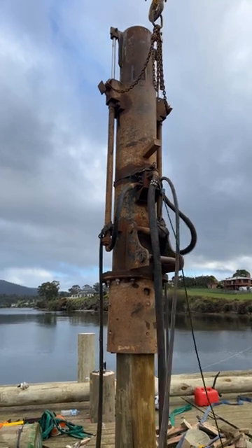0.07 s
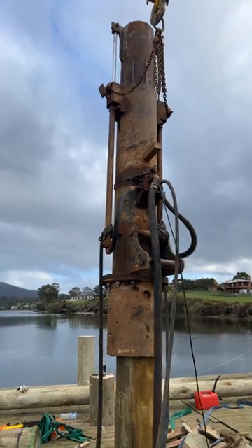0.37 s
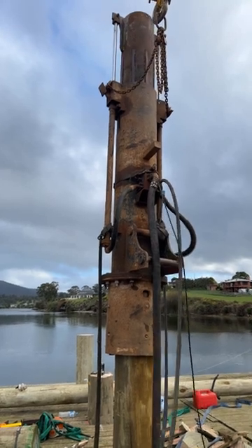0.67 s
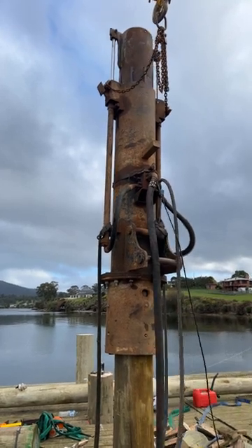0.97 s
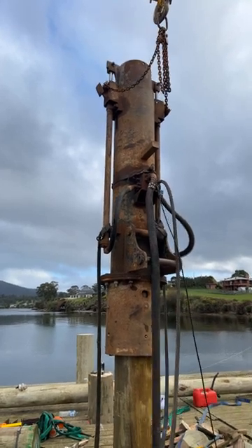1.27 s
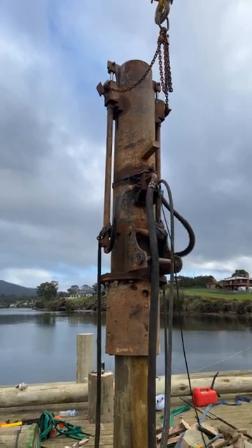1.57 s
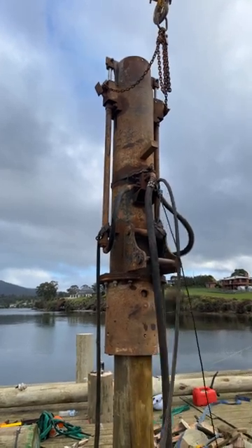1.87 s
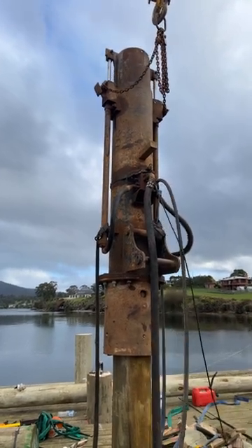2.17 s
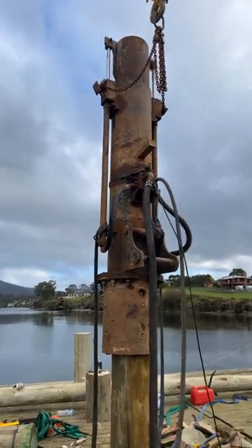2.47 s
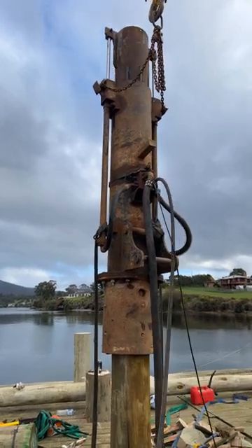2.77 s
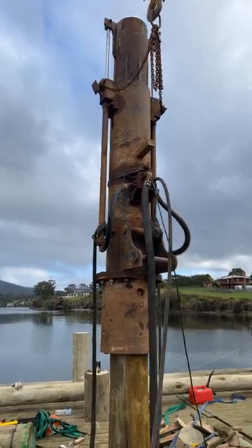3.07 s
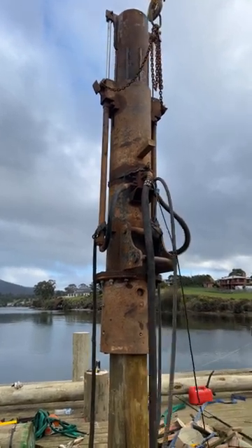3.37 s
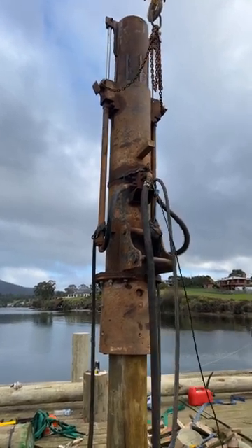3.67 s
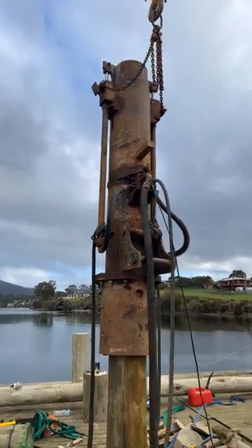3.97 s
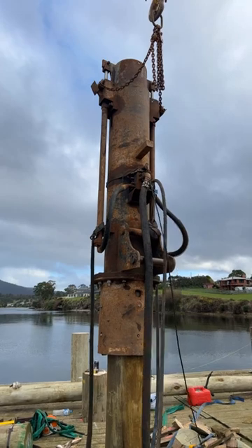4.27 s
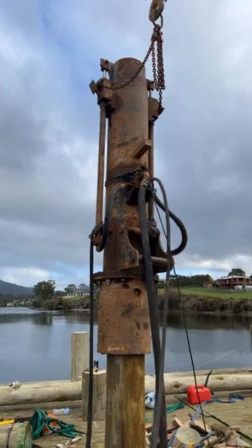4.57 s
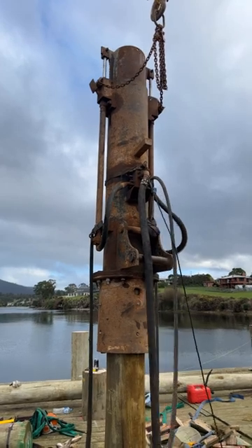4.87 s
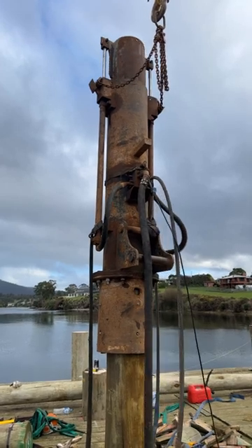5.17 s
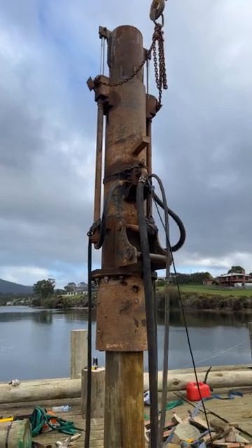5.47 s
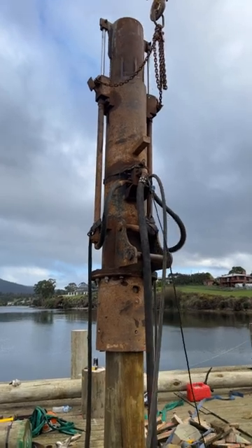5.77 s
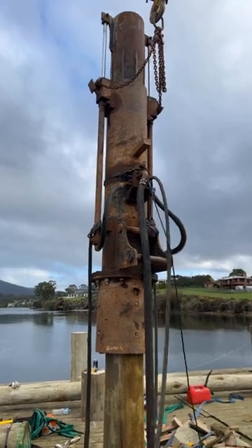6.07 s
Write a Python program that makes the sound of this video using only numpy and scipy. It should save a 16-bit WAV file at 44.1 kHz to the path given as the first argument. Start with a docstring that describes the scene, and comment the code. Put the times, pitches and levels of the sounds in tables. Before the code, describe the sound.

Over a droning engine, a heavy drop hammer slams twice onto a steel pile cap, with sharp valve clacks before and after.

```python
"""A hydraulic drop hammer drives a timber pile from a river jetty: two clanging blows.
A valve clacks, the rigging rattles, the ram slides down, slams onto the steel cap and chatters,
and the banks throw the blow back. The valve clacks again and oil surges to lift the ram.
Underneath drones the power pack, running up while the ram is free, sagging and hunting under load.
Each blow makes a limiter duck the drone."""
import sys
import numpy as np
from scipy import signal
from scipy.fft import rfft, irfft
from scipy.io import wavfile
from scipy.ndimage import uniform_filter1d, minimum_filter1d, map_coordinates

SR = 44100
rng = np.random.default_rng(int(sys.argv[2]) if len(sys.argv) > 2 else 0)


def transcribe(u):
    """Save the signal u as a 16-bit wav file named by the first command-line argument.

    u: samples, shape (n,) or (channels, n), limited to [-1, 1]; the rate is SR.
    q: integer samples, one column per channel.
    """
    v = np.clip(np.atleast_2d(u).T, -1, 1)
    q = np.round(v * 32767).astype(np.int16)
    wavfile.write(sys.argv[1], SR, q)


N = 278712

# fader ride of the exhaust drone: time_s, level_db
EXHAUST_FADER = [(0, -16.5), (1.1, -17), (1.6, -18), (6.32, -17.5)]
# partials of the exhaust note: multiple_of_firing_rate, relative_db
EXHAUST_ORDERS = [(1, -1.5), (1.5, -15), (2, 3.5), (3, 0), (3.5, -34), (4, -27), (4.5, -24.5), (5, -38.5),
                  (6.5, -33), (7, -44.5), (8, -38.5), (9.25, -35.5), (12.5, -32.5)]
# tone of the engine's clatter: frequency_hz, relative_db
CLATTER_SPECTRUM = [(60, -7), (170, 1.5), (230, -2.5), (290, -7), (500, -13.5), (700, -15), (900, -21.5),
                    (1400, -21), (2300, -24), (3000, -30.5), (5000, -34.5), (6200, -46), (9500, -59.5),
                    (15000, -67)]
# resonances of the engine casing: centre_hz, width_hz, boost_db
CASING_RESONANCES = [(290, 69, 1.5), (437.3, 18, 6), (615, 110, 5), (1210, 300, 4.5), (3520, 590, 4.5)]
# low rumble under the engine: frequency_hz, relative_db
RUMBLE_SPECTRUM = [(20, -31.5), (32, -26.5), (48, -7.5), (75, 2.5), (115, -6.5), (150, -6),
                   (185, -17.5), (260, -33), (900, -78)]
# diffuse tails of jetty and shore: delay_s, level_db, t60_s, cutoff_hz
SHORE_TAILS = [(0.031, -24, 0.64, 5040), (0.448, -52, .9, 1470)]
# echoes off the banks: delay_s, level_db
BANK_ECHOES = [(.144, -17), (.293, -36.5), (.765, -43), (.96, -46.5), (1.1, -47), (1.44, -47.5)]
# rigging rattles as the ram is let go: after_valve_s, level_db, centre_hz, width_octaves
RIGGING_RATTLES = [(.075, -48, 1680, .2), (.075, -56.5, 4800, .26), (.158, -57.5, 5000, .38),
                   (.196, -52.5, 4240, .38)]
# valve clacks, dropping and lifting the ram in turn: start_s, level_db, pitch_ratio
VALVE_CLACKS = [(0.6294, -22.5, 1.04), (1.6244, -21, 1.037), (3.4111, -23.5, 1.036), (4.434, -21, 1.035),
                (6.292, -22, 1.005)]
# ring of the valve: pitch_hz, relative_db, t60_s
VALVE_MODES = [(1150, -19.5, 0.019), (1750, -10.5, .009), (2100, -13, 0.014), (3384, -5.5, 0.022),
               (4420, -2, 0.0085), (4990, -0.5, 0.0047), (6430, -14, 0.0062), (6990, -21, 0.016),
               (9100, -23, 0.0042), (13300, -21, .0025)]
# the valve's tick scattered by the deck: delay_s, level_db, t60_s, cutoff_hz
DECK_REFLECTIONS = [(.001, -3, 0.014, 14000), (.006, -11, 0.049, 7180)]
# dense clang of cap and pile: frequency_hz, relative_db, t60_s
CLANG_SPECTRUM = [(60.5, -15.5, 0.43), (185, 3.5, 0.14), (230, -4, 0.2), (473, -6.5, 0.19),
                  (690, -5.5, 0.24), (990, -8.5, 0.15), (1500, -8.5, 0.21), (2310, -7, 0.18),
                  (2960, -17.5, 0.18), (3830, -13, 0.17), (4630, -18, .18), (6240, -28, 0.18),
                  (10500, -59, .24), (15000, -55, .22)]
# ring of the steel tube and the pile: pitch_hz, relative_db, t60_s
TUBE_MODES = [(172, -10, .22), (238, -24, .35), (288, -23, 1.1), (324, -27, .6), (406, -19.5, .36),
              (437, -24, .38), (584, -13, .2), (620, -19, .28), (680, -18, .28), (731, -19, .26),
              (765, -16, .3), (792, -21, .26), (848, -22, .26), (936, -19, .32), (978, -21, .3),
              (1119, -24, .33), (1223, -22, .3), (1258, -20, .33), (1298, -21, .36), (1348, -22, .22),
              (1823, -22, .21), (1882, -21, .21), (2290, -21, .17), (2355, -19, .17), (2428, -20, .16),
              (2675, -26, .22), (3640, -24, .2), (3780, -28, .22), (5280, -35.5, .38), (7510, -56.5, .48)]
# blows of the ram: slam_s, relative_db, tilt_db_per_octave
RAM_BLOWS = [(1.1935, 0, -0.5), (3.9759, -0.5, 0)]
# each blow's light touch, slam and rebounds: after_slam_s, body_db, crack_db, tilt_db_per_octave
BLOW_CONTACTS = [(-.017, -29.5, -41.5, -5), (0, 0.5, 9.5, -.5), (0.0201, -0.5, 0, -0.5),
                 (.027, -5.5, 0.5, 0), (0.0497, -6.5, -2.5, 2), (.069, -13.5, -14, -2)]

HUNT_HZ = 2.66   # the governor's swing, heard in the engine's pitch and in the oil


def from_db(db):
    """Decibels to gain."""
    return 10 ** (np.asarray(db) / 20)


def rms_one(x):
    """Normalise to an rms of 1."""
    return x / np.sqrt(np.mean(x ** 2) + 1e-20)


def seconds():
    """The time of every sample."""
    return np.arange(N) / SR


def bin_hz():
    """The frequency of every FFT bin, at least 1 Hz."""
    return np.maximum(np.arange(N // 2 + 1) * SR / N, 1)


def at_hz(spectrum, hz, column=1):
    """One column of a spectrum table, read on a log-frequency axis."""
    rows = np.array(spectrum)
    return np.interp(np.log(hz), np.log(rows[:, 0]), rows[:, column])


def bell_eq(hz, resonances):
    """The dB that a set of resonances adds at each frequency."""
    return sum(boost_db / (1 + (2 * (hz - centre) / width) ** 2)
               for centre, width, boost_db in resonances)


def noise(spectrum_db):
    """Noise of rms 1, coloured by an EQ curve."""
    return rms_one(irfft(rfft(rng.standard_normal(N)) * from_db(spectrum_db), N))


def drift(rate_hz):
    """A smooth random wobble of rms 1."""
    knots = rng.standard_normal(2048)
    return rms_one(map_coordinates(knots, [seconds() * rate_hz], order=2, mode="wrap"))


def clicks(times, sizes):
    """One-sample triggers."""
    out = np.full(N, 1e-18)
    out[np.round(np.asarray(times) * SR).astype(int)] = sizes
    return out


def fade(x, t60):
    """Each click becomes a step that dies away."""
    return signal.lfilter([1], [1, -from_db(-60 / (t60 * SR))], x)


def ring(x, hz, t60):
    """Each click sets a decaying sine ringing."""
    radius, angle = from_db(-60 / (t60 * SR)), 2 * np.pi * hz / SR
    return signal.lfilter([0, np.sin(angle)], [1, -2 * radius * np.cos(angle), radius * radius], x)


def low_pass(x, hz):
    """Roll off the top at 12 dB per octave."""
    return signal.sosfilt(signal.butter(2, min(hz, .45 * SR), fs=SR, output="sos"), x)


def scatter(x, reflectors):
    """Each reflector returns a delayed, smeared and dulled copy."""
    response = 0
    for delay_s, level_db, t60, cutoff_hz in reflectors:
        burst = fade(clicks([delay_s], 1), t60) * rng.standard_normal(N)
        response = response + from_db(level_db) * low_pass(burst / np.linalg.norm(burst), cutoff_hz)
    return signal.fftconvolve(x, response)[:N]


def valve_times():
    """Cues in seconds: the ram's drops, and its lifts."""
    times = np.array(VALVE_CLACKS)[:, 0]
    return times[::2], times[1::2]


def firing_rate(loaded_hz=47.38, run_up_hz=.69, unload_lag_s=.085, load_lag_s=.19, glide_s=.1,
                swing_hz=1.15, settle_s=.65):
    """The engine runs up while the ram is free; under the next lift it sags and its governor hunts."""
    t = seconds()
    drops, lifts = valve_times()
    rate_hz = loaded_hz
    for drop_s in drops:
        rate_hz = rate_hz + run_up_hz * np.clip((t - drop_s - unload_lag_s) / glide_s, 0, 1)
    for lift_s in lifts:
        loaded_s = np.maximum(t - lift_s - load_lag_s, 0)
        hunting = swing_hz * np.exp(-loaded_s / settle_s) * np.sin(2 * np.pi * HUNT_HZ * loaded_s)
        rate_hz = rate_hz - run_up_hz * np.minimum(loaded_s / glide_s, 1) - hunting
    return rate_hz


def exhaust(phase, waver_db=0.6, roughness=0.17 - 0.01, dispersion_rad=-1.16):
    """The drone: its strong orders hold firm, the weak ones flutter with uneven firing."""
    out = 0
    for order, level_db in EXHAUST_ORDERS:
        flutter = from_db(waver_db * drift(14)) if level_db > -10 else 1 + roughness * drift(10)
        silencer_lag = dispersion_rad * order * (order - 1)
        out = out + from_db(level_db) * flutter * np.cos(order * phase + silencer_lag)
    return rms_one(out)


def casing_clatter(firings, repeat_share=.68, throb=0.17, waver_db=.5):
    """The casing knocks: part of the low end loops every four firings, the treble is always fresh."""
    hz = bin_hz()
    cycle = rng.standard_normal(3700)
    loop = rms_one(map_coordinates(cycle, [firings / 4 % 1 * len(cycle)], order=1, mode="wrap"))
    share = repeat_share / (1 + (hz / 1000) ** 2)
    knocks = np.sqrt(share) * rfft(loop) + np.sqrt(1 - share) * rfft(rng.standard_normal(N))
    tone_db = at_hz(CLATTER_SPECTRUM, hz) + bell_eq(hz, CASING_RESONANCES)
    clatter = rms_one(irfft(knocks * from_db(tone_db), N))
    return clatter * (1 + throb * np.cos(2 * np.pi * firings)) * from_db(waver_db * drift(27))


def power_pack(clatter_db=-41, rumble_db=-39, whine_db=-81, whine_hz=9600):
    """The bed: a four-cylinder engine's exhaust, clatter and rumble, with a thin pulsing whine."""
    t = seconds()
    firings = np.cumsum(firing_rate()) / SR
    phase = 2 * np.pi * firings
    drone = from_db(np.interp(t, *np.transpose(EXHAUST_FADER))) * exhaust(phase)
    clatter = from_db(clatter_db) * casing_clatter(firings)
    rumble = from_db(rumble_db) * noise(at_hz(RUMBLE_SPECTRUM, bin_hz()))
    whine = np.sin(2 * np.pi * whine_hz * t) * np.cos(2.5 * phase) * (1 + np.cos(phase))
    return drone + clatter + rumble + from_db(whine_db) * whine


def river_echoes(x, t60_per_delay=0.17, cutoff_at_1s_hz=2050):
    """The space: a diffuse tail, and echoes off the banks that blur and dull with distance."""
    banks = [(delay_s, level_db, t60_per_delay * delay_s, cutoff_at_1s_hz / delay_s ** 0.43)
             for delay_s, level_db in BANK_ECHOES]
    return scatter(x, SHORE_TAILS + banks)


def swell(peak_s, level_db, hz, octaves, rise_s, fall_s):
    """A band of hiss that swells to a peak and dies away."""
    t = seconds()
    colour_db = -60 * np.log10(1 + (np.log2(bin_hz() / hz) / (2 * octaves)) ** 2)
    envelope = np.exp(-np.maximum((peak_s - t) / rise_s, (t - peak_s) / fall_s))
    return from_db(level_db) * envelope * noise(colour_db)


def rigging_rattle():
    """The rigging shakes each time the ram is let go."""
    drops, _ = valve_times()
    return sum(swell(drop_s + delay_s, level_db, hz, octaves, rise_s=.006, fall_s=.013)
               for drop_s in drops for delay_s, level_db, hz, octaves in RIGGING_RATTLES)


def ram_slide():
    """The sliding ram hisses louder as it gathers speed, and stops at the blow."""
    return sum(swell(slam_s, level_db=-54, hz=3400, octaves=.5, rise_s=.13, fall_s=.01)
               for slam_s, *_ in RAM_BLOWS)


def oil_surge(lag_s=.245, first_db=-55.5, step_db=-7):
    """Oil surges as a lift begins, then twice more, weaker with each swing of the governor."""
    _, lifts = valve_times()
    return sum(swell(lift_s + lag_s + swing / HUNT_HZ, first_db + swing * step_db,
                     hz=3300, octaves=.3, rise_s=0.037, fall_s=.065)
               for lift_s in lifts for swing in range(3))


def valve(spread_db=0.5):
    """The spool hits its stop, never twice alike; the deck scatters the tick."""
    ticks = 0
    for start_s, level_db, pitch_ratio in VALVE_CLACKS:
        chance_db = spread_db * rng.standard_normal(len(VALVE_MODES))
        for k, (hz, mode_db, t60) in enumerate(VALVE_MODES):
            size = from_db(level_db + mode_db + chance_db[k]) * (-1) ** k
            ticks = ticks + ring(clicks([start_s], size), hz * pitch_ratio, t60)
    return ticks + scatter(ticks, DECK_REFLECTIONS)


def cap_clang(times, body_db, tilt_db_per_octave, gain_db=11.5, boost_db=6, width_hz=22):
    """The dense ring of cap and pile: noise, strongest around the modes, dying away band by band."""
    edges = np.geomspace(50, 16000, 26)
    centres = np.sqrt(edges[1:] * edges[:-1])
    colour_db = bell_eq(bin_hz(), [(hz, width_hz, boost_db) for hz, *_ in TUBE_MODES])
    noises = [noise(colour_db), noise(colour_db)]   # neighbouring bands take different noise
    out = 0
    for k, hz in enumerate(centres):
        tilt_db = tilt_db_per_octave * np.log2(np.clip(hz, 300, 5000) / 1000)
        sizes = from_db(gain_db + body_db + at_hz(CLANG_SPECTRUM, hz) + tilt_db)
        t60 = at_hz(CLANG_SPECTRUM, hz, column=2)
        energy = fade(clicks(times, sizes ** 2), t60 / 2)   # contacts pile up in energy
        band = signal.butter(3, edges[k:k + 2], "band", fs=SR, output="sos")
        out = out + signal.sosfilt(band, noises[k % 2] * np.sqrt(energy))
    return out


def tube_ring(times, body_db, gain_db=-2.5, spread_db=0.5):
    """The pitched ring of tube and pile: each contact pushes or pulls every mode."""
    out = 0
    for hz, mode_db, t60 in TUBE_MODES:
        sizes = from_db(gain_db + body_db + mode_db + spread_db * rng.standard_normal(len(times)))
        polarity = rng.choice([-1, 1], len(times))
        out = out + ring(clicks(times, sizes * polarity), hz, t60)
    return out


def hammer():
    """The ram touches, slams and rebounds on the cap; each contact cracks, clangs and rings."""
    contacts = [(slam_s + delay_s, blow_db + body_db, blow_db + crack_db, blow_tilt + tilt)
                for slam_s, blow_db, blow_tilt in RAM_BLOWS
                for delay_s, body_db, crack_db, tilt in BLOW_CONTACTS]
    times, body_db, crack_db, tilt = np.transpose(contacts)
    crack = ring(clicks(times, from_db(crack_db)), hz=820, t60=0.0071)
    return cap_clang(times, body_db, tilt) + tube_ring(times, body_db) + low_pass(crack, hz=2500)


def scene(grit_db=2):
    """The mono mix: blows and echoes over the engine bed, with the small sounds of the working cycle."""
    blows = hammer()
    mix = power_pack() + blows + river_echoes(blows) + valve()
    hiss = rigging_rattle() + ram_slide() + oil_surge()
    grit = from_db(grit_db * drift(150))
    return (mix + hiss * grit)[None]


def limiter(x, ceiling=0.97, hold_s=0.096, release_db_per_s=45):
    """The gain ducks just ahead of a peak, holds, then climbs back."""
    over_db = 20 * np.log10(np.maximum(np.abs(x) / ceiling, 1))
    ahead_db = -minimum_filter1d(-over_db, size=97)
    half_hold = int(hold_s * SR / 2)
    held_db = -minimum_filter1d(-ahead_db, 2 * half_hold + 1, origin=half_hold)
    ramp_db = release_db_per_s * seconds()
    duck_db = np.maximum.accumulate(held_db + ramp_db) - ramp_db
    return x * from_db(-uniform_filter1d(duck_db, size=96))


def record(dry, cutoff_hz=16600):
    """The master chain: a limiter, then a steep high cut."""
    high_cut = signal.cheby2(14, 70, cutoff_hz, fs=SR, output="sos")
    return signal.sosfilt(high_cut, limiter(dry[0]))[None]


dry = scene()
out = record(dry)
transcribe(out)
```